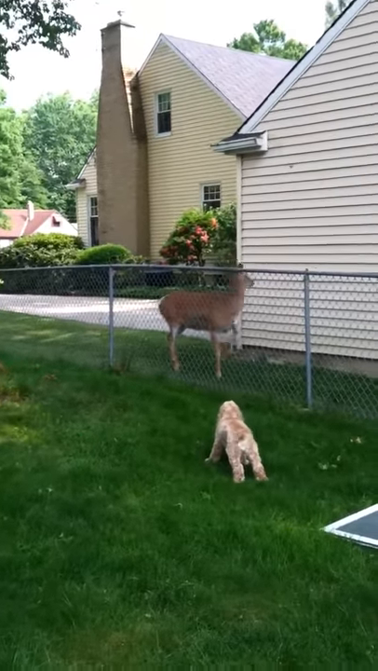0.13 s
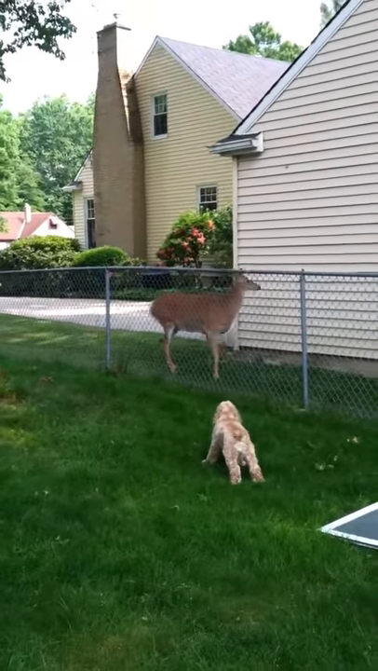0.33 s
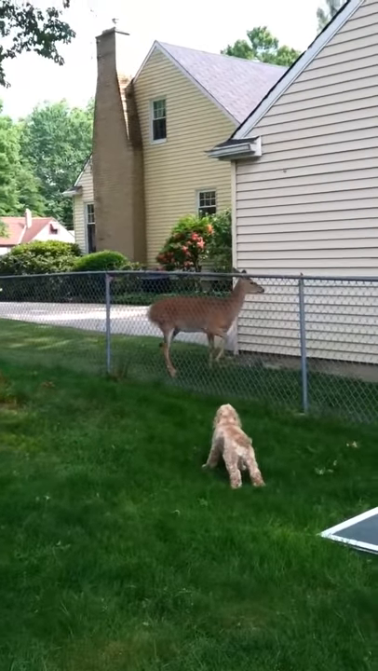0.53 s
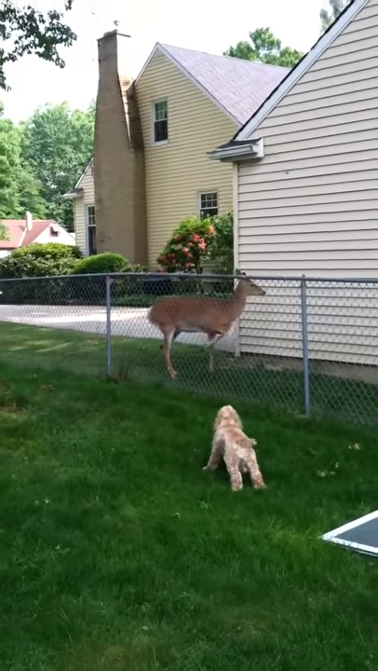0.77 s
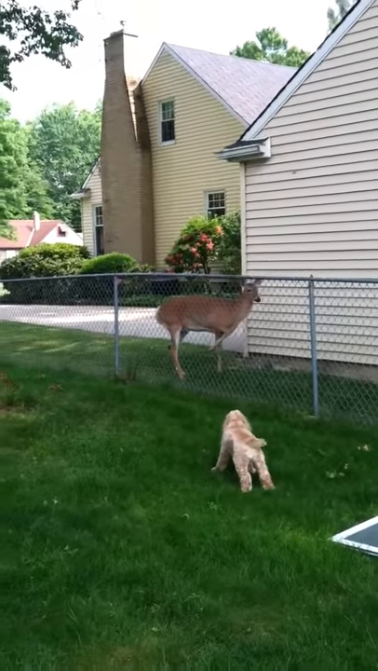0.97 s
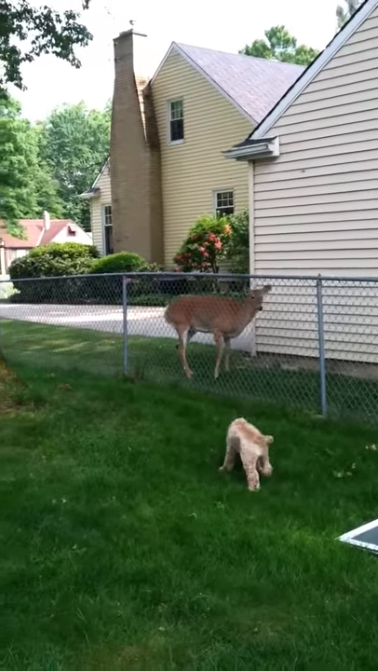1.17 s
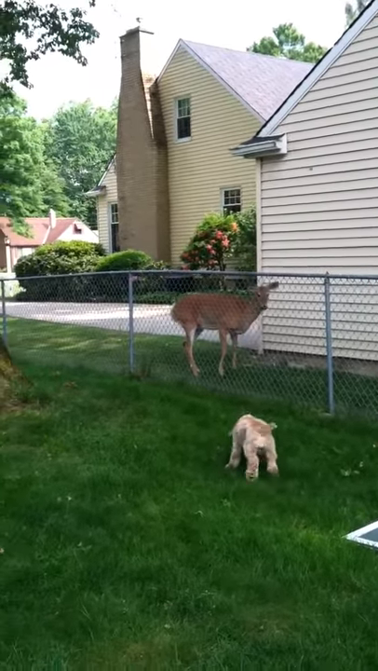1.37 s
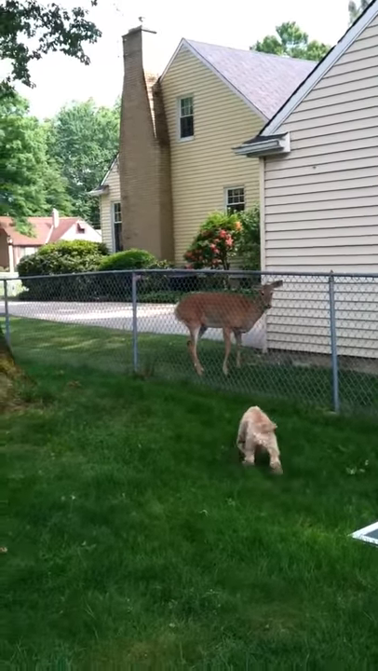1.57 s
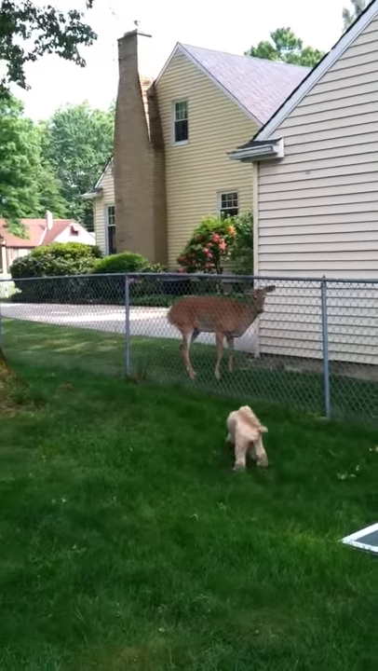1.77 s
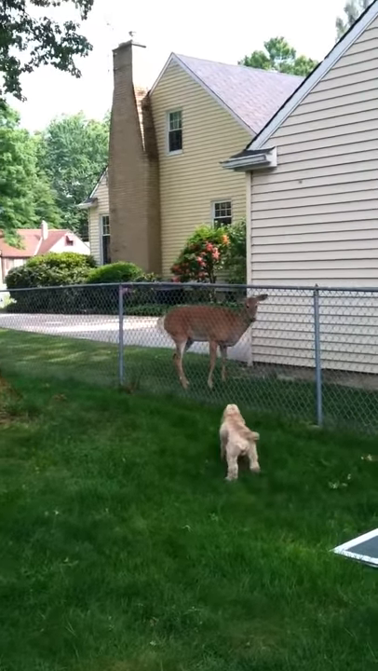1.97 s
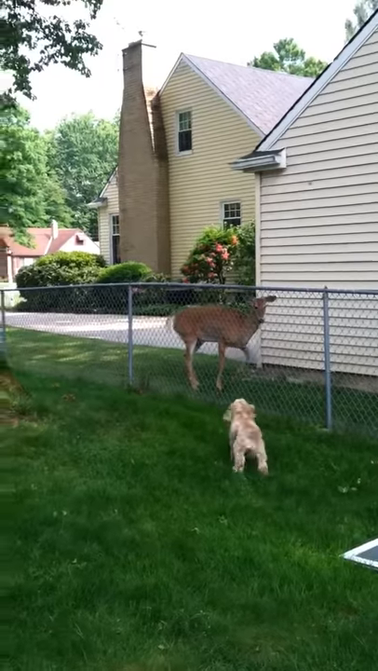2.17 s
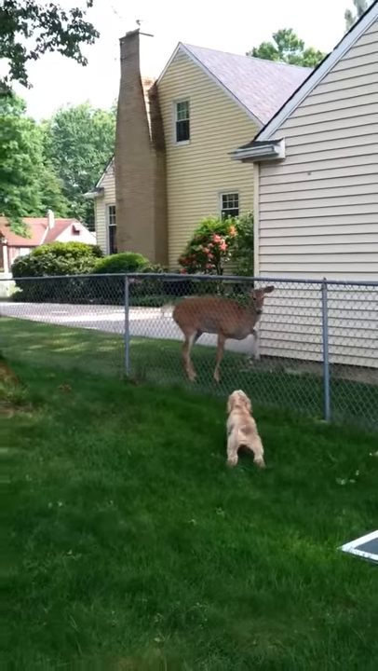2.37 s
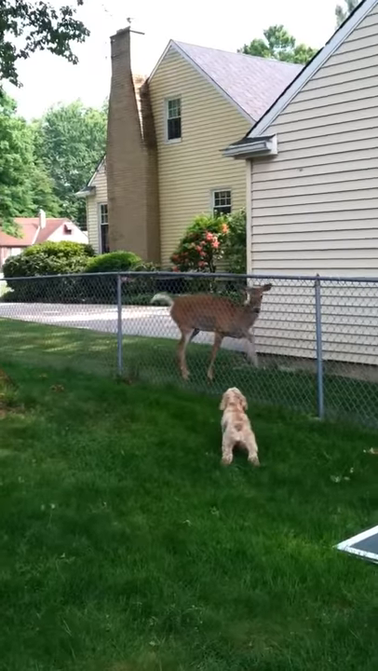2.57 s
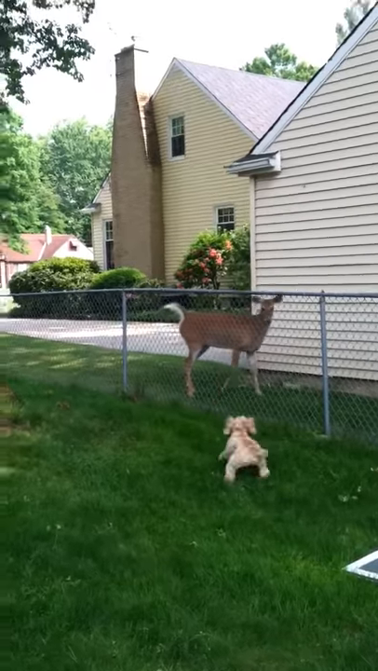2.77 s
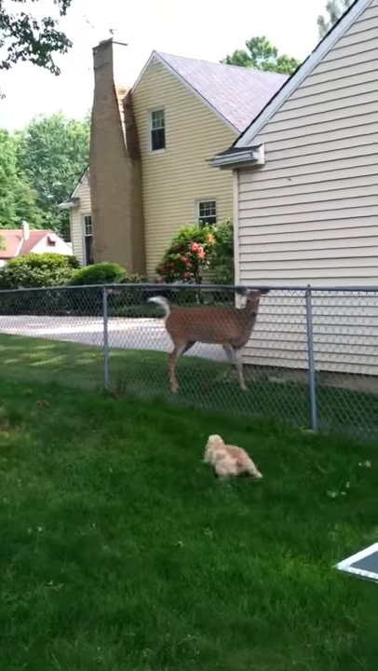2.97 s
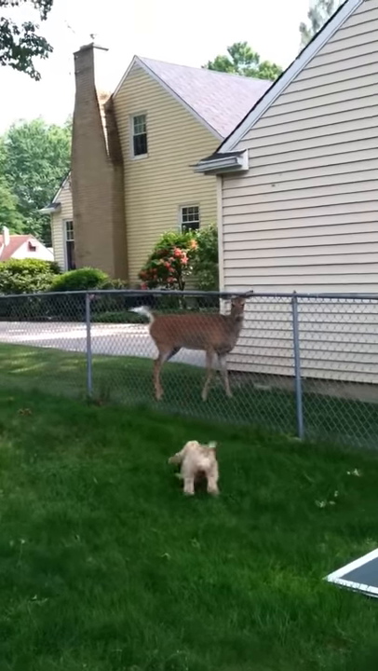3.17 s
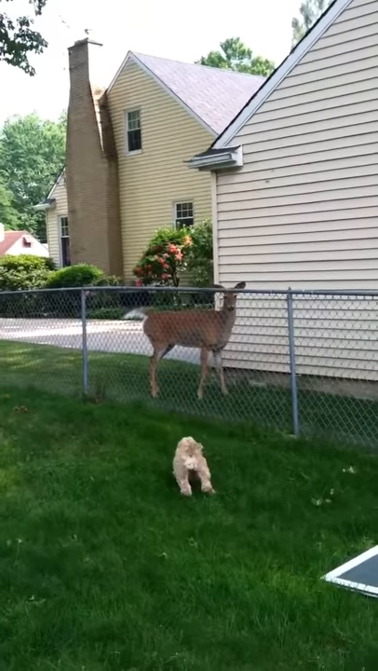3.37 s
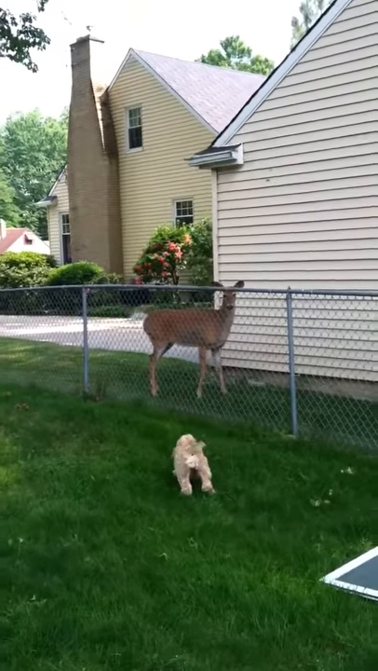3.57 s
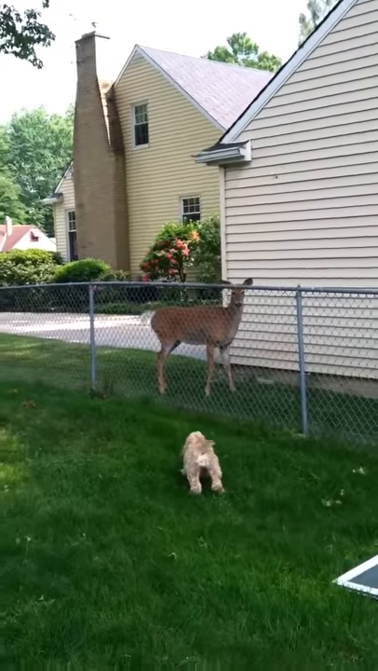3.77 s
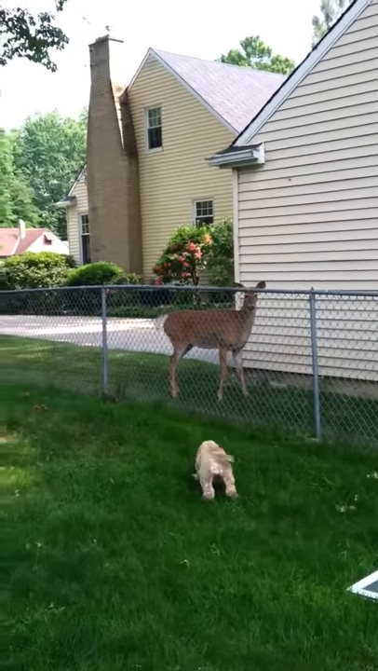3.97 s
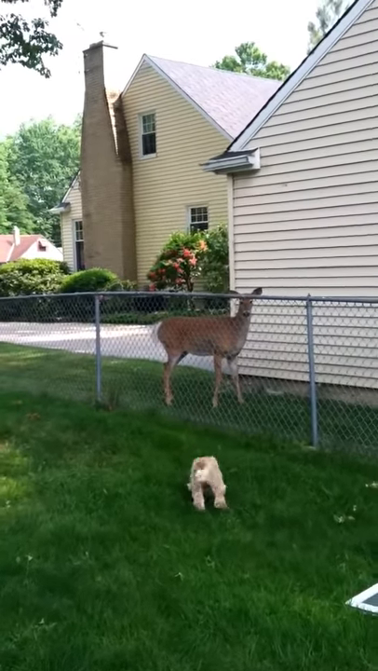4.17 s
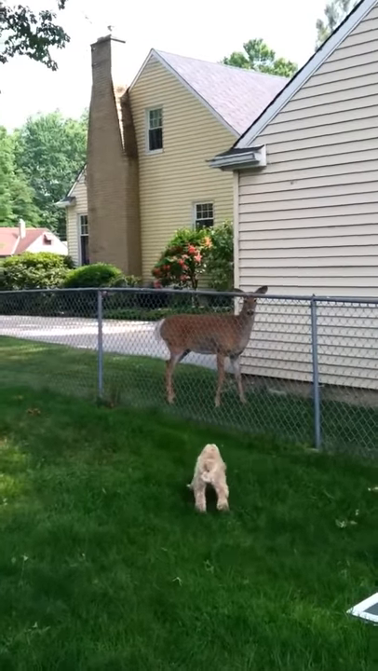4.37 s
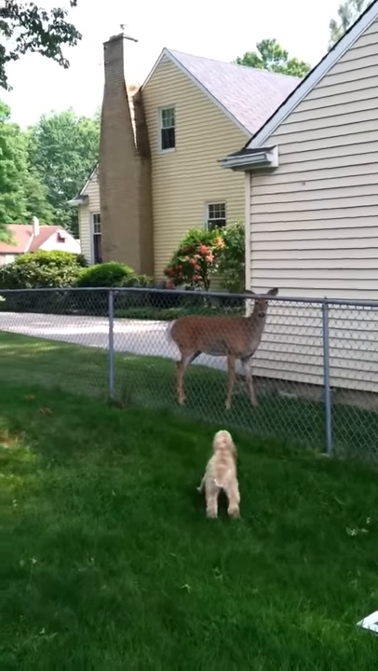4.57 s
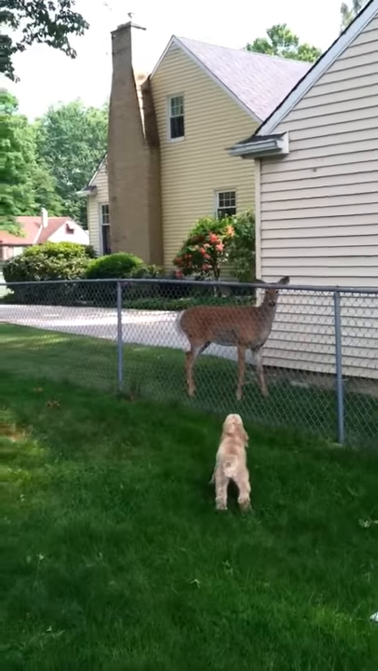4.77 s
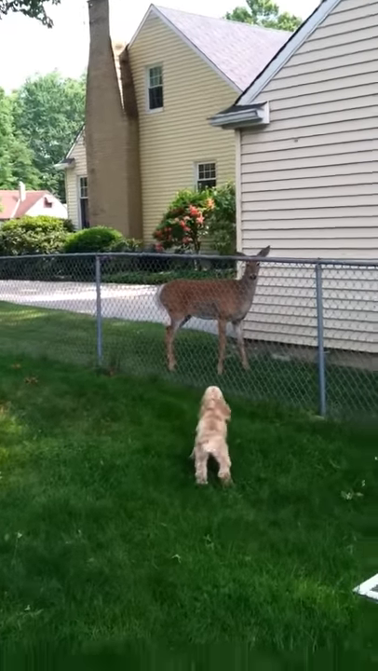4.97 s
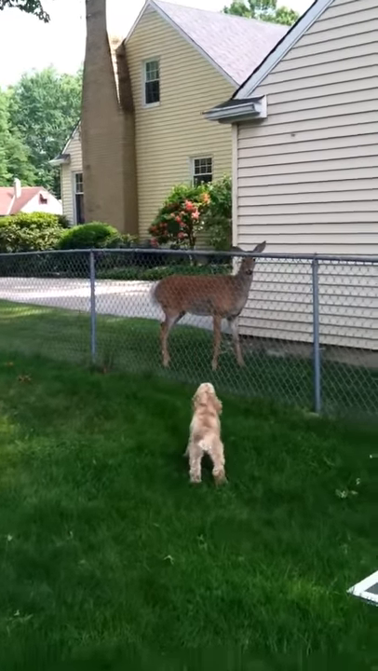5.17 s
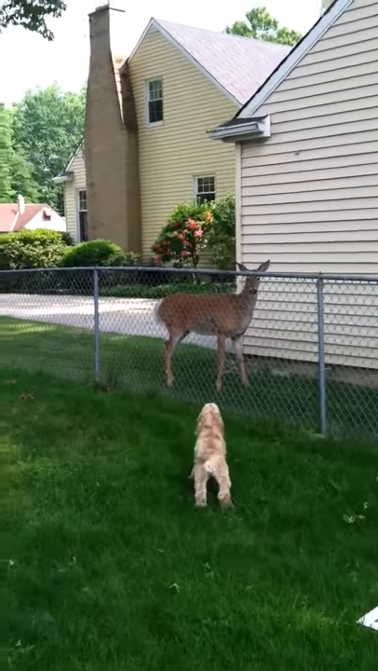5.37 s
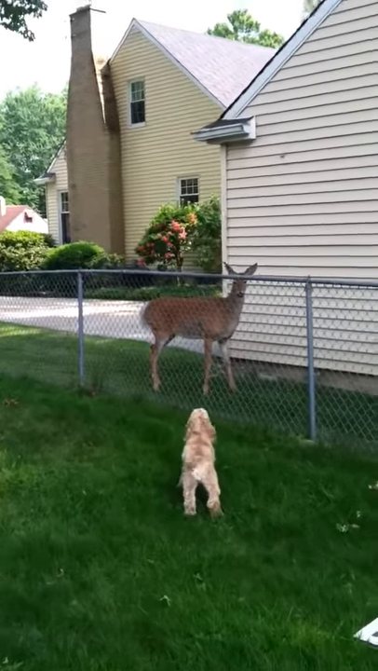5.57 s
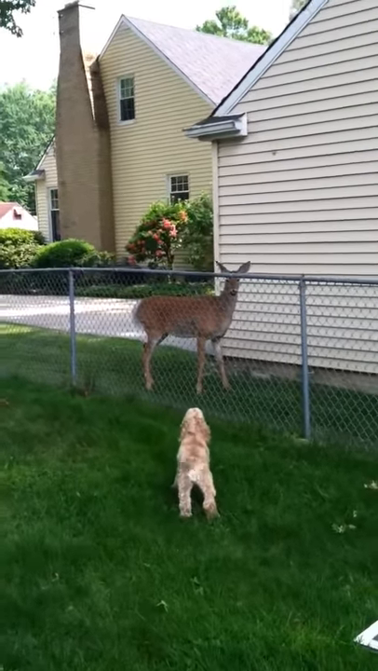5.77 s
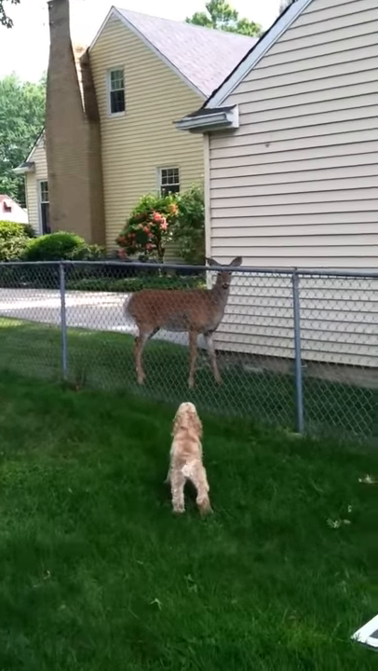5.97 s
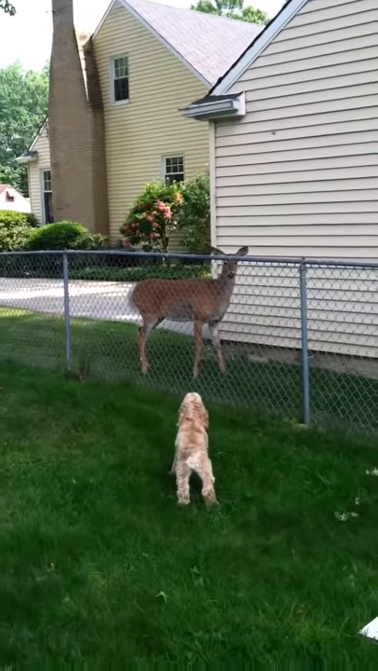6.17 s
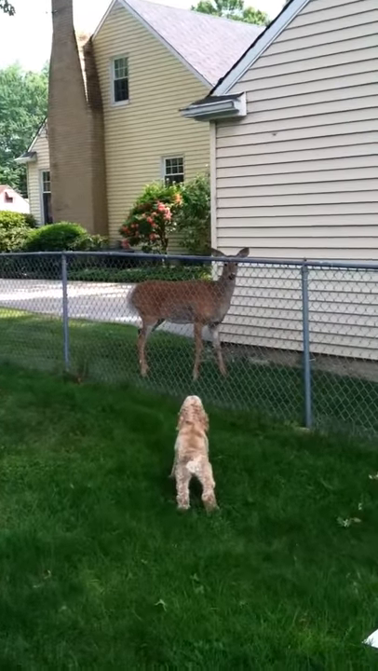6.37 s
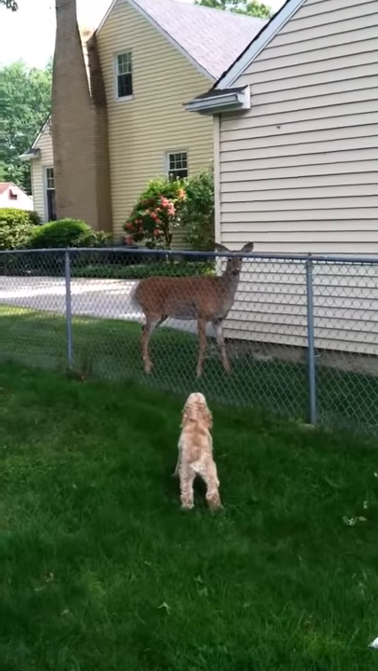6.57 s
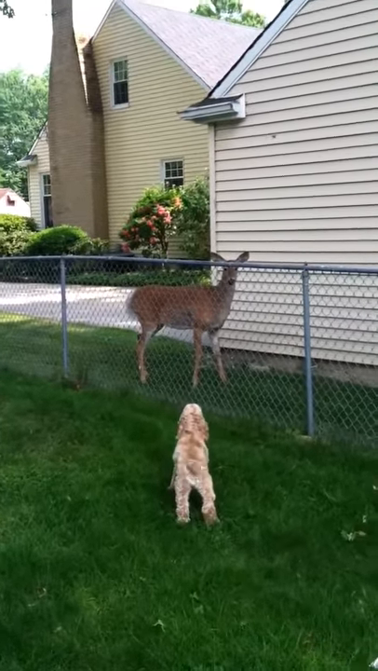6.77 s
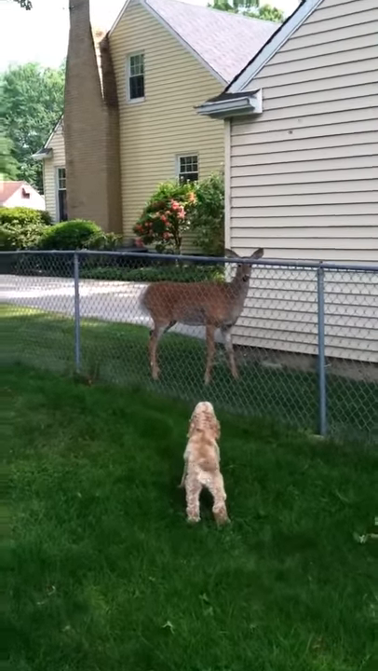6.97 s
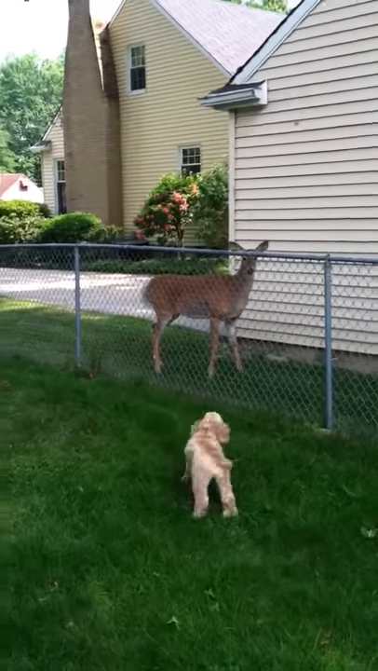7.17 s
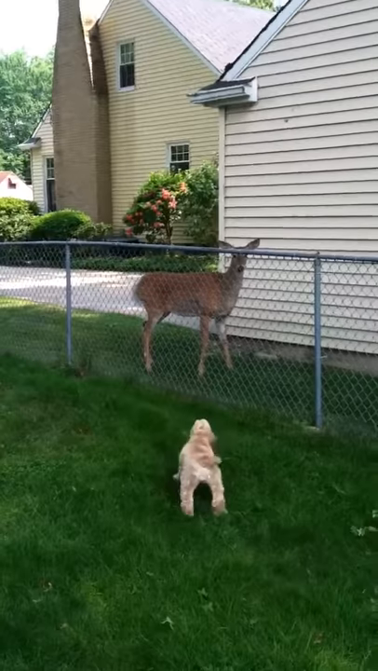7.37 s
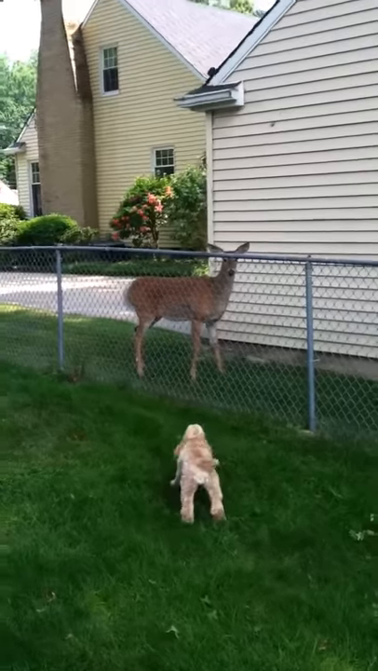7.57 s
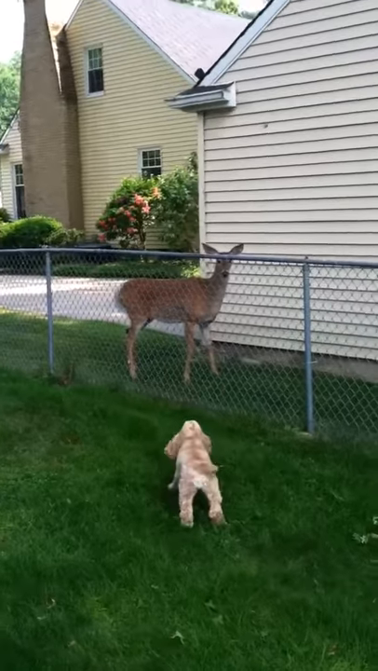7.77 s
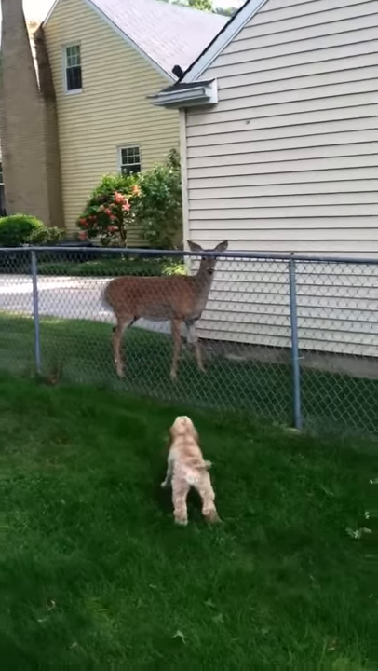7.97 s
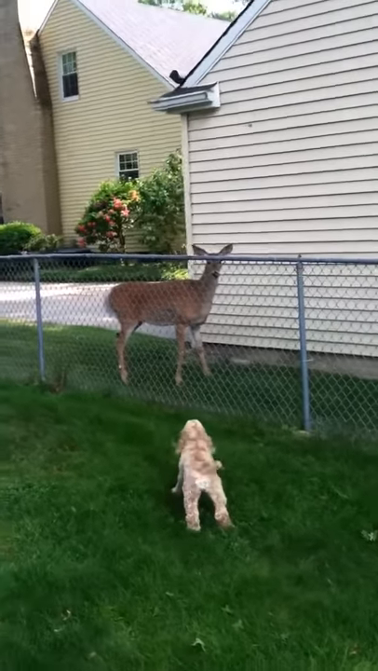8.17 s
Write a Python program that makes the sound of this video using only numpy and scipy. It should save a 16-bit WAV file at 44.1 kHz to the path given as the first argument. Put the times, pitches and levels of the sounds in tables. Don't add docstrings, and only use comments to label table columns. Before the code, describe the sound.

A small dog gives three lone barks, then two livelier yelping series in a grassy yard, while fingers knock on the camera over faint traffic hum.

```python
import sys
import numpy as np
from scipy import signal
from scipy.fft import rfft, irfft, next_fast_len
from scipy.io import wavfile
from scipy.ndimage import uniform_filter1d, map_coordinates

SR = 44100
rng = np.random.default_rng(int(sys.argv[2]) if len(sys.argv) > 2 else 0)


def int16_out(signal):
    q = np.round(np.clip(np.atleast_2d(signal).T, -1, 1) * 32767)
    wavfile.write(sys.argv[1], SR, q.astype(np.int16))


def invert_db(level):
    return 10 ** (np.asarray(level, dtype=float) / 20)


N = 361928

# start in seconds, rise in seconds, end in seconds, peak level in dB,
# top pitch in Hz.
BARKS = [
    (1.758, .042, 1.828, -21.5, 585.8),
    (2.812, .073, 2.958, -23.5, 670),
    (3.935, 0.087, 4.085, -21.5, 665.6),
    (4.222, 0.084, 4.335, -20, 683.3),
    (4.529, .076, 4.638, -22.5, 662),
    (4.904, 0.068, 5.017, -21, 671.5),
    (7.1, 0.057, 7.228, -17.5, 651),
    (7.405, 0.08, 7.512, -18.5, 671.7),
]
SLACK_HZ = 250.2


def unit(x):
    return x / np.sqrt(np.mean(x ** 2) + 1e-20)


def along(points, hz):
    f, v = np.transpose(points)
    return np.interp(np.log(hz + 1), np.log(f + 1), v)


def wobble(n, rate):
    knots = rng.standard_normal(int(n * 2000 / SR) + 8)
    return map_coordinates(knots, [np.cumsum(np.full(n, rate)) / SR + 2])


def filtered(x, response):
    m = next_fast_len(len(x) + 8192)
    return irfft(rfft(x, m) * response(np.fft.rfftfreq(m, 1 / SR)), m)[:len(x)]


def add(track, s, sound):
    part = track[max(round(s * SR), 0):][:len(sound)]
    part += sound[:len(part)]


def sampled(rows, fade):
    s, *cols = np.transpose(rows)
    t = s[0] + np.arange(SR // 5) / SR
    ends = np.clip(np.minimum(t - s[0], s[-1] - t) / fade, 0, 1)
    return [np.interp(t, s, c) for c in cols], ends


def dog():
    # roughness climbing (0-1), roughness held (0-1), sag in Hz, fade in dB,
    # mouth tilt in dB per octave.
    bark_voices = [(.45, 0.44, 0.5, 1.5, 2.5), (.4, .65, 124.5, 9.5, 3.5), (.6, 0, 60.5, 10.5, -1),
                   (0, 0.11, 27.5, 25.5, -4.5), (0, 0.15, 17, 7.5, -1), (0.2, .05, 7, 5, -3),
                   (.9, 0.12, 65, 8.5, -0.5), (0.19, 0.08, 15, 5.5, -3)]
    # start in seconds, hold in seconds, slide in seconds,
    # peak level in dB, pitch in Hz.
    yelps = [
        (1.829, .046, 0.012, -20, 642.7),
        (2.961, 0.021, 0.023, -33.5, 1061),
        (4.083, .004, 0.027, -33, 928.6),
        (4.338, .052, 0.018, -29, 977),
        (4.639, 0.038, 0.033, -18, 958),
        (5.018, 0.05, 0.024, -20.5, 968),
        (7.227, .014, 0.025, -19.5, 973),
        (7.514, 0.028, 0.037, -19.5, 1006),
    ]
    # roughness (0-1), fade in dB, mouth tilt in dB per octave,
    # landing level in dB, landing in seconds.
    yelp_voices = [(0.17, 5, 2.5, -37.5, 0.0034), (0.5, -2.5, -4, -51.5, 0.002), (.5, 0.5, 4, -33, 0.048),
                   (.08, 5.5, 2, -36, 0.043), (0.2, 21.5, -5.5, -39.5, 0.0086),
                   (0.01, 17.5, -2, -44, 0.041), (.25, 14, 0, -32.5, 0.0064), (.4, 4, -5.5, -38.5, 0.032)]
    # start in seconds, end in seconds, first level in dB, last level in dB,
    # pitch in Hz.
    moans = [
        (4.165, 4.21, -48, -41, 247),
        (4.475, 4.526, -49, -40, 240),
        (4.76, 4.824, -50, -39, 217.9),
        (7.293, 7.422, -49, -48, 223.8),
    ]
    out = np.zeros(N)
    notes = [*map(bark, BARKS, bark_voices), *map(yelp, yelps, yelp_voices), *(moan(*row) for row in moans)]
    for rows in notes:
        voice = note(rows)
        add(out, rows[0][0], voice)
        add(out, rows[0][0], houses(voice))
    return out


def bark(call, voice):
    # share of the rise, share of the pitch gained,
    # level in dB under the peak, mouth tilt in dB per octave.
    shared_climb = [(0, 0.0057, -31.5, -15), (.35, .68, -14.5, -4), (0.722, .93, -5, 1), (1, 0.99, 0, 2.5)]
    settle_s, open_per_db = 0.025, 0.9119
    s, rise, end, db, top_hz = call
    climbing, held, sag_hz, fade_db, mouth = voice
    opened = any(0 < s - other[0] < .45 for other in BARKS)
    climb = []
    for u, gained, under_db, shut in shared_climb:
        tilt = mouth + (4.4 * (u < 1) if opened else shut)
        rough = climbing
        climb.append((s + u * rise, SLACK_HZ + gained * (top_hz - SLACK_HZ), db + under_db, rough, tilt))
    climb[-1] = climb[-1][:3] + ((climbing + held) / 2, climb[-1][4])
    hold = end - s - rise
    u = min(settle_s / hold, .8)
    steady = (s + rise + u * hold, top_hz - u ** .6 * sag_hz, db - u * fade_db, held,
              mouth + open_per_db * u * fade_db)
    return climb + [steady, (end, top_hz - sag_hz, db - fade_db, held, mouth + open_per_db * fade_db)]


def yelp(call, voice):
    s, hold, slide, db, hz = call
    rough, fade_db, mouth, landing_db, landing = voice
    overshoot, sag, settle_s = 0.061, 0.0299, 0.01114
    landing_hz, landing_sag = 510, 1927
    slide_rough, landing_mouth = .18, -4
    low_hz, held_db = hz * (1 - sag), db - fade_db
    down = s + hold + slide
    landed = down + landing
    u = min(settle_s / hold, .6)
    return [(s, hz * (1 + overshoot), db, rough, mouth),
            (s + u * hold, hz, db - u * fade_db, rough, mouth),
            (s + hold, low_hz, held_db, rough, mouth + 0.7 * fade_db),
            (down - slide / 2, (low_hz + landing_hz) / 2, min(held_db, landing_db) + 1, slide_rough, 1.7),
            (down, landing_hz, landing_db, slide_rough, landing_mouth),
            (landed, landing_hz - landing_sag * landing, landing_db, slide_rough, landing_mouth - 300 * landing),
            (landed + .025, SLACK_HZ, landing_db - 21.5, slide_rough, landing_mouth)]


def moan(s, end, first_db, last_db, hz):
    rough, mouth, sag = 0.068, -7.5, 0.057
    return [(s, hz * (1 + sag), first_db, rough, mouth), (end, hz * (1 - sag), last_db, rough, mouth)]


def note(rows):
    # frequency in Hz, gain in dB.
    throat = [(300, -5), (660, 8.5), (900, -1.5), (1270, 3), (1600, -22), (2050, -3.5), (2400, -12),
              (2750, -15.5), (3420, -19.5), (3680, -37), (4900, -38.5), (5700, -47), (8500, -52),
              (10000, -83)]
    (pitch, db, rough, mouth), ends = sampled(rows, fade=0.0012)
    n, rough = len(pitch), np.clip(rough, 0, 1)
    jitter = 0.0607 * rough * wobble(n, 255.1) + 0.0058 * wobble(n, 66.1)
    phase = 2 * np.pi * np.cumsum(pitch * (1 + jitter)) / SR
    k = np.arange(1, 17)[:, None]
    tilt = mouth * np.minimum(np.log2(k * pitch / 700), 2)
    gain = invert_db(along(throat, k * pitch) + tilt)
    slide = np.minimum(np.abs(np.gradient(np.log(pitch))) * SR, 12)
    gain *= invert_db(-.12 * uniform_filter1d(slide, size=300) * np.maximum(k - 2, 0))
    clear = np.exp(-.55 * rough * (k - 1 + 1.2 * rough) - .004 * (k - 1) ** 2)
    flicker = invert_db(0.83 * np.array([wobble(n, 74.6) for _ in k]) * np.minimum(k - 1, 1))
    skip = 1 + 0.84 * rough * np.cos(phase / 2) * (k > 1)
    beat = np.sum(gain * clear * flicker * skip * np.cos(k * phase - .3 * k * k), axis=0)
    beat *= invert_db(2 * rough * wobble(n, 240))
    width = np.minimum(130 + 900 * rough ** 2, 1000)
    smear = np.array([wobble(n, width) * np.cos(j * phase) + wobble(n, width) * np.sin(j * phase) for j in k])
    rasp = np.sum(np.sqrt(1 - clear ** 2) * smear * invert_db(tilt), axis=0)
    rasp = filtered(rasp, lambda hz: invert_db(along(throat, hz) - 2.5))
    air = rng.standard_normal(n) * invert_db(-13 + 1.6 * np.minimum(mouth, 6) + 21.0 * rough)
    rasp += filtered(air, lambda hz: invert_db(along(throat, hz) + 5.2 * np.log2((hz + 1) / 700)))
    return invert_db(db) * ends * (beat + rasp) / np.sqrt(np.sum(gain ** 2, axis=0) / 2)


def houses(x):
    # delay in seconds, level in dB.
    walls = [(.012, -12), (.027, -20.5), (.045, -21.5), (.062, -34.5), (.088, -41.5), (.12, -27.5)]
    # frequency in Hz, time to fall 60 dB in seconds.
    decay = [(200, 0.19), (700, 0.75), (2000, 0.81), (5000, 0.96), (10000, 1)]
    hz, t, z = signal.stft(rng.standard_normal(SR), SR, nperseg=256)
    scatter = invert_db(15.5 - 60 * t / 0.19)
    fall = invert_db(-60 * t / along(decay, hz)[:, None]) + scatter
    tail = signal.istft(z * fall, SR, nperseg=256)[1]
    tail *= 1 - np.exp(-np.arange(len(tail)) / SR / 0.006)
    answer = invert_db(-3.5) * tail / np.linalg.norm(tail)
    for s, db in walls:
        add(answer, s, invert_db(db) * np.array([.3, .5, .2]))
    return signal.fftconvolve(x, answer)


def taps():
    # start in seconds, peak level in dB, pitch in Hz, edge level in dB.
    knocks = [(0.138, -33, 250, -35), (0.176, -39, 134, -27), (0.364, -47, 218, 10),
              (0.392, -26.5, 980, -14), (0.442, -28.5, 930, -19), (0.453, -29, 229, -26),
              (0.483, -35, 197, -21), (0.543, -30.5, 910, -16.5), (0.609, -31.5, 920, -14),
              (1.117, -29.5, 1010, 0.5), (2.582, -34.5, 236, -27), (2.756, -29, 955, -17),
              (3.062, -35, 209, -2), (3.674, -44.5, 202, -10), (4.861, -20, 580, -21),
              (4.874, -25, 189, -8.5), (5.159, -31, 165.5, -21), (5.362, -33.5, 165, -3.5),
              (5.568, -48, 173, 4.5), (5.785, -39.5, 135.5, -17), (5.895, -40, 196, -18),
              (6.016, -35, 210, -24), (6.091, -44.5, 169, -24), (6.735, -23.5, 192, -37),
              (6.804, -38.5, 131.5, -14), (6.84, -40, 331, -9), (6.859, -39, 204, -24),
              (4.544, -24.5, 340, -20),
        (4.587, -30.5, 288, -15),
        (4.613, -31, 347, -19.5),
        (4.818, -34.5, 220, -8),
        (7.478, -29.5, 220, -29),
        (7.5, -31.5, 198, -27),
        (7.616, -27.5, 270, -10),
        (7.663, -38, 190, -16),
    ]
    # frequency in Hz, level in dB.
    shell = [(1900, -7), (2700, -9), (3450, -2), (4900, -17), (6000, -18)]
    out, t = np.zeros(N), np.arange(SR // 25) / SR
    for s, db, hz, edge_db in knocks:
        low = hz < 450
        if low:
            settling = 2.58 * (1 - np.exp(-t / 0.00055))
            ring = np.sin(2 * np.pi * hz * t + settling) * invert_db(-60 * t / (0.0027 + 5 / hz))
        else:
            swell = (1 - np.exp(-t / 0.00094)) ** 2
            ring = 2.6 * np.sin(2 * np.pi * hz * t) * invert_db(-60 * t / 0.0078) * swell
        edge = np.zeros(len(t))
        for shell_hz, shell_db in shell:
            mode_hz = shell_hz * (.55 if low else 1)
            level = invert_db(shell_db + rng.normal(0, 1.5))
            edge += level * np.sin(2 * np.pi * mode_hz * t + rng.uniform(0, 7.7))
        edge *= invert_db(edge_db + 9.0 - 60 * t / 0.0042) * (1 - np.exp(-t / 0.00048))
        add(out, s + .003, invert_db(db) * (ring + edge))
    return out


def creaks():
    # start in seconds, peak level in dB, low part in dB, top part in dB.
    ticks = [(0.3144, -56.5, 3, -21), (0.3318, -55, -8, -28), (0.3654, -66.5, 0, -25),
             (0.4653, -61.5, 0, -21), (0.604, -48.5, 2, -28.5), (3.5495, -40, 11, -54),
             (4.8437, -61.5, -15.5, -13.5), (4.8932, -62, -2, -20), (5.5994, -64.5, -2, -18),
             (6.6982, -47, 1, -25), (6.8164, -37, -2.5, -10), (6.9186, -41.5, -3.5, -14.5),
             (7.2043, -50.5, 2, -4), (7.215, -33, -11.5, -24), (7.227, -44, 10, -5), (7.295, -49, -16, -20),
             (7.4472, -24, 0.5, -8), (7.604, -39.5, 29.5, -21), (7.8705, -45.5, 18, -29),
             (7.9358, -44.5, -10, -12.5), (8.0028, -46.5, 12, -21), (8.098, -62, 0, -21)]
    out, t = np.zeros(N), np.arange(SR // 25) / SR
    for s, db, low_db, top_db in ticks:
        spectrum = [(1200, -44), (2500, low_db), (4500, low_db), (7000, -2.5), (10000, -8),
                    (13000, top_db + 15.5), (15500, top_db - 6)]
        click = rng.standard_normal(len(t)) * (invert_db(-60 * t / 0.00037) + 0.05 * invert_db(-60 * t / .02))
        click = filtered(click, lambda hz: invert_db(along(spectrum, hz)))
        add(out, s + 0.0039, invert_db(db) * click / np.max(np.abs(click)))
    return out


def finger_slides():
    # time in seconds, centre in Hz, level in dB.
    slides = [
        [(4.42, 11300, -78), (4.445, 9700, -62), (4.5, 10400, -66), (4.56, 11000, -71)],
        [(8.15, 12500, -80), (8.18, 9270, -62), (8.2, 5200, -56), (8.21, 4950, -59)],
    ]
    out = np.zeros(N)
    for rows in slides:
        (hz, db), ends = sampled(rows, fade=0.0056)
        n = len(hz)
        sweep = np.sin(2 * np.pi * np.cumsum(hz) / SR)
        rub = 1.68 * filtered(rng.standard_normal(n), lambda f: f < 2200) + .5 * wobble(n, 430)
        add(out, rows[0][0], invert_db(db) * ends * sweep * rub)
    return out


def rush(spectrum, patchy_db):
    z = signal.stft(rng.standard_normal(N + 512), nperseg=512)[2]
    field = uniform_filter1d(rng.standard_normal(z.shape), size=5, axis=0)
    field = uniform_filter1d(field, size=10, axis=1)
    noise = signal.istft(z * invert_db(patchy_db * unit(field)), nperseg=512)[1][:N]
    return unit(filtered(noise, lambda hz: invert_db(along(spectrum, hz))))


def far_traffic():
    # time in seconds, level in dB.
    hum = [(0.0, -56.5), (0.89, -62), (1.87, -57), (2.42, -62), (2.81, -56), (3.26, -61), (4.47, -60),
           (5.0, -53.5), (5.14, -55), (6.87, -59), (7.33, -57.5), (8.2, -57.5)]
    # frequency in Hz, density in dB per Hz.
    spectrum = [(20, -22), (50, -31), (80, -17), (120, -4), (160, -1), (220, -4), (400, -27), (800, -100)]
    s, hum_db = np.transpose(hum)
    level_db = np.interp(np.arange(N) / SR, s, hum_db) + 0.83 * wobble(N, 4.3)
    return invert_db(level_db) * rush(spectrum, patchy_db=2.5)


def yard_air():
    # frequency in Hz, density in dB per Hz.
    spectrum = [(150, -27), (250, -3.5), (357, -4), (528, -5.5), (575, -8), (658, -3), (909, -4),
                (1100, -3), (1340, -12), (3660, -16), (9800, -33.5), (14500, -46.5)]
    level_db = -56 + 0.13 * wobble(N, 4) + 0.34 * wobble(N, 0.8)
    return invert_db(level_db) * rush(spectrum, patchy_db=1.5)


def electronics():
    # frequency in Hz, level in dB.
    whine = [(10761, -94), (14998, -87)]
    t = np.arange(N) / SR
    return sum(invert_db(db + 3) * np.sin(2 * np.pi * hz * t) for hz, db in whine)


def scene():
    # frequency in Hz, gain in dB.
    mic = [(20, -48), (60, -15.5), (110, -7.5), (160, 1), (15000, 1.5)]
    near = dog() + taps() + creaks() + finger_slides()
    near = filtered(near, lambda hz: invert_db(along(mic, hz)) * (hz < 15750))
    return (near + far_traffic() + yard_air())[None]


def low_pass(x):
    return signal.sosfilt(signal.butter(12, 15830, fs=SR, output="sos"), x)


def record(dry):
    return low_pass(dry + electronics())


dry = scene()
out = record(dry)
int16_out(out)
```